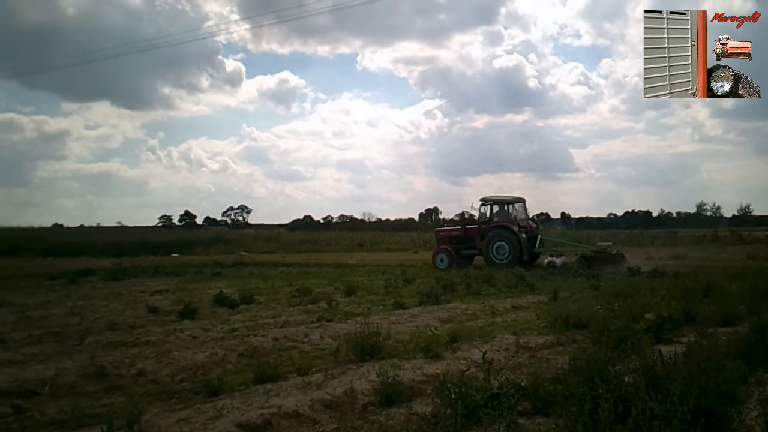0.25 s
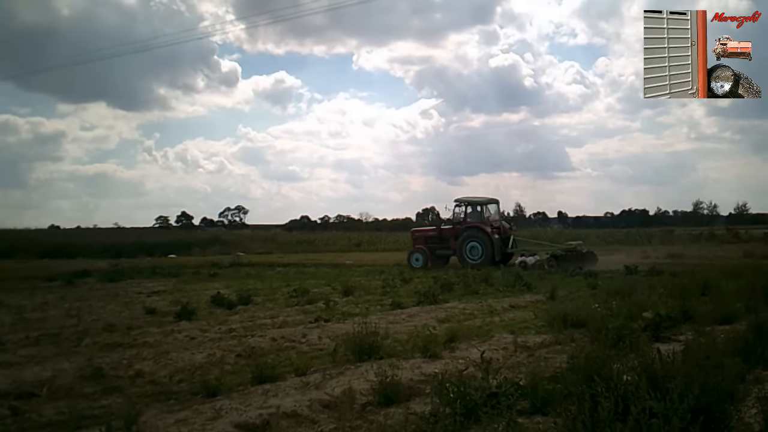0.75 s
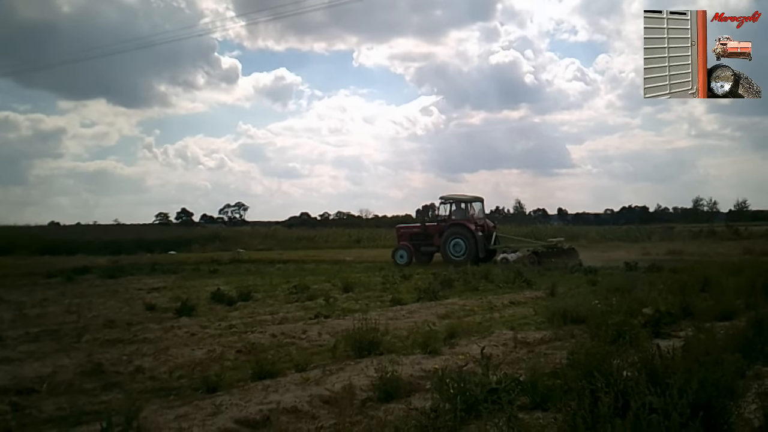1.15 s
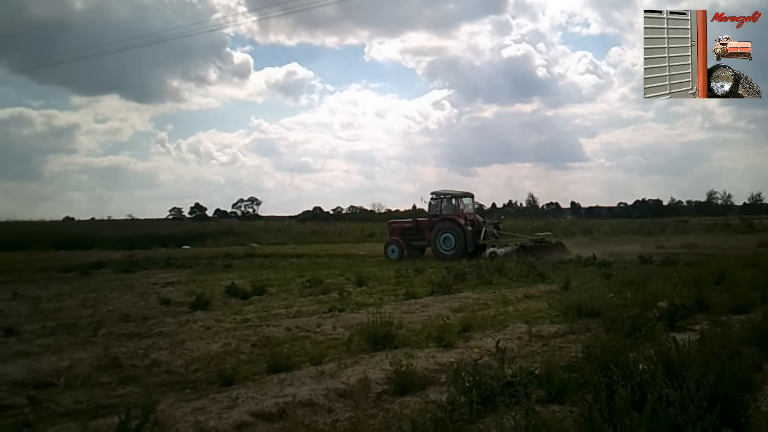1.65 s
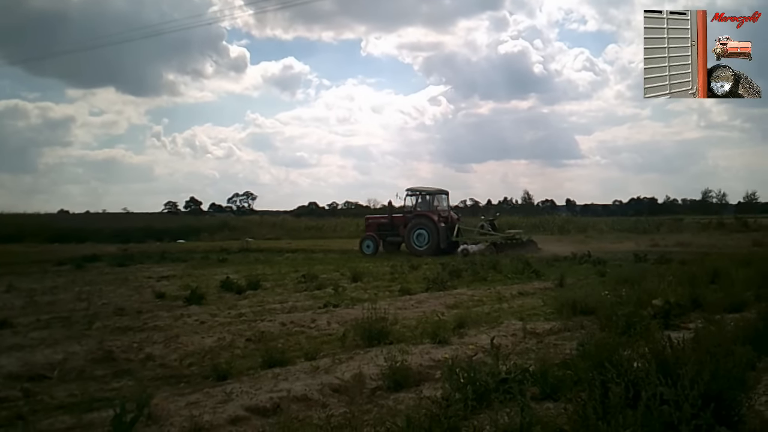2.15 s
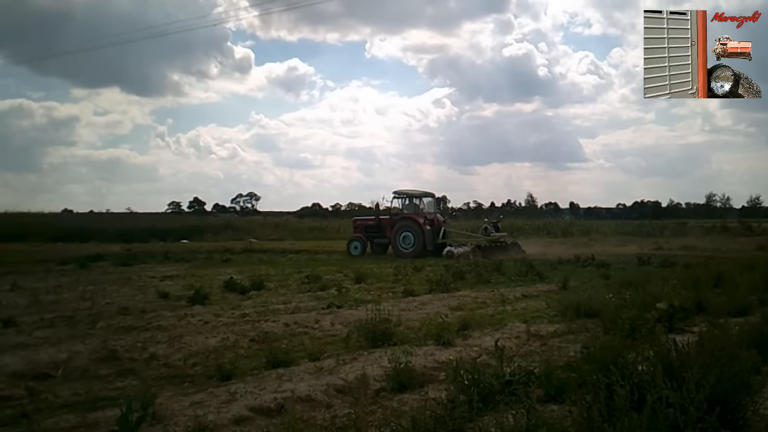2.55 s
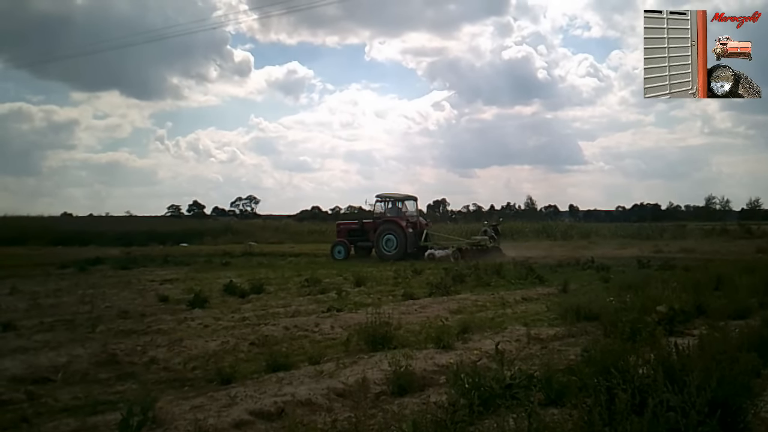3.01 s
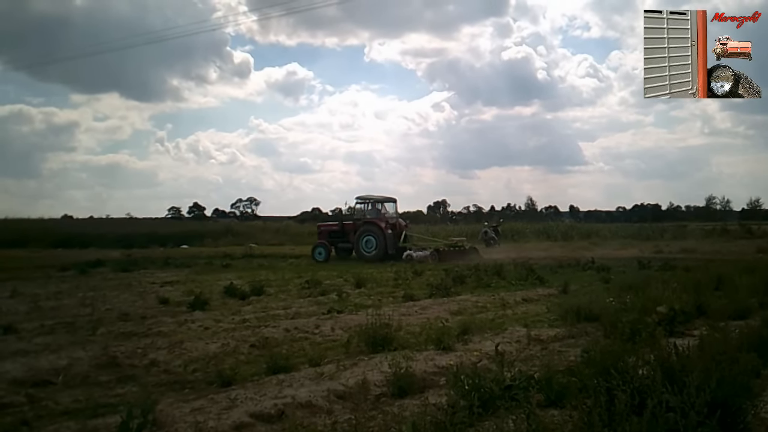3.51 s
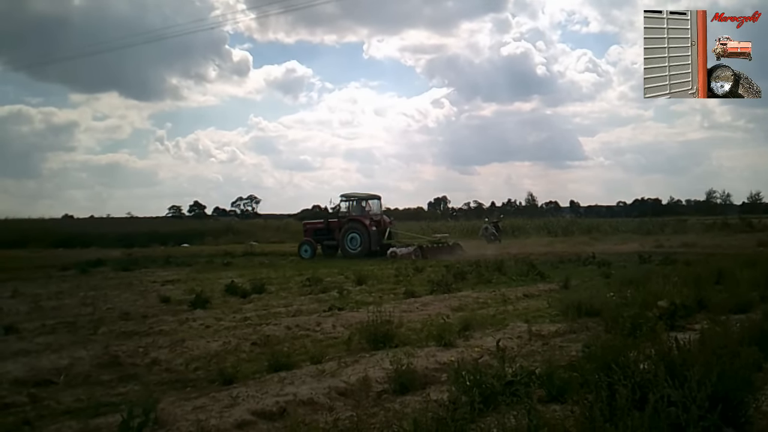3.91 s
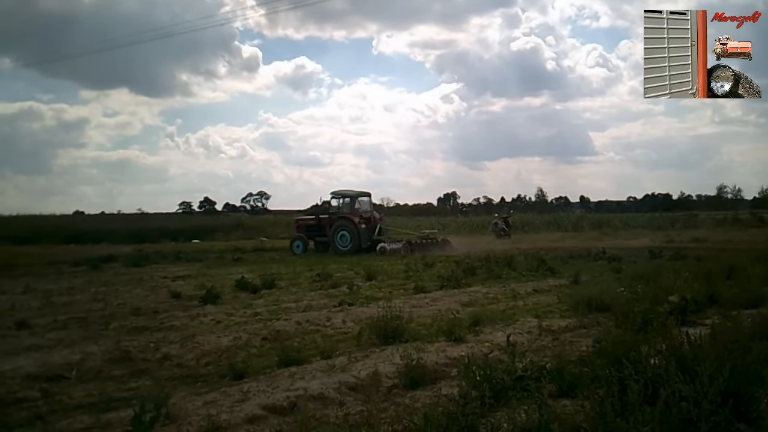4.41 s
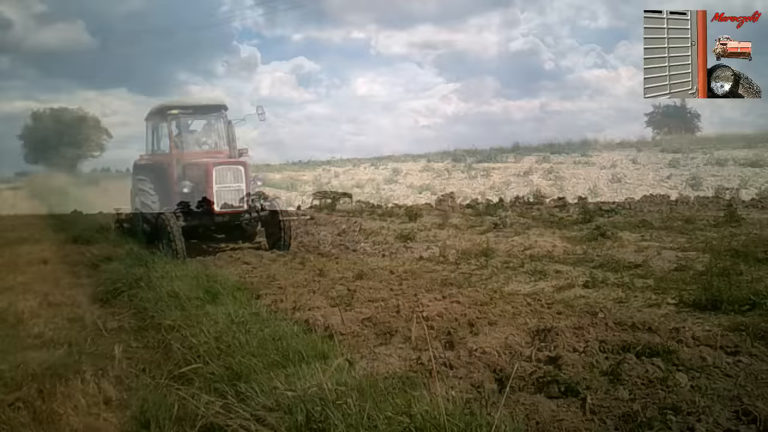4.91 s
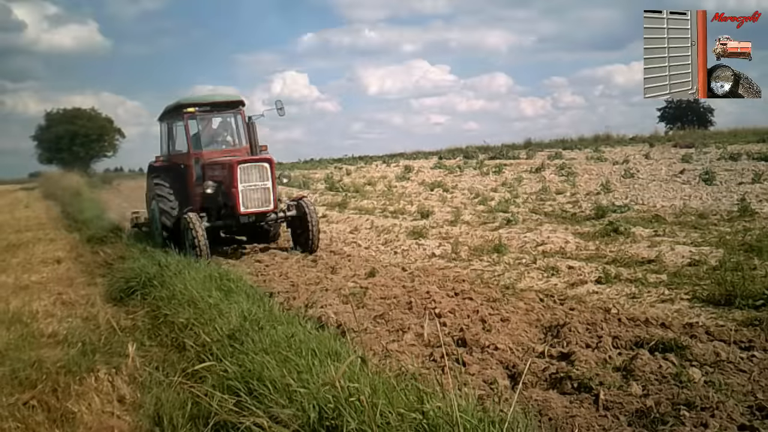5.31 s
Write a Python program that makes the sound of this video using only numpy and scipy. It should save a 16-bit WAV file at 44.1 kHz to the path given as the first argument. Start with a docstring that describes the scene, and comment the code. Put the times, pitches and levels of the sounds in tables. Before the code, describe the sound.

A diesel tractor chugs unevenly at a distance across a field, then a hard cut makes it loud, close, booming and slightly faster.

```python
"""Diesel tractor dragging a harrow

A four-cylinder diesel tractor drags a disc harrow across a field: far off, then, after a hard cut, close and head-on.
Every firing excites the exhaust modes as a thump, flares a rasp of gas noise and knocks on the engine block.
Far off, one faulty cylinder weakens and fires late in bouts, so the beat stumbles; close up, one firing almost fails.
Running gear and soil give shaped noise, a drone follows the far engine, short bright noise clicks dot the near view.
Close thumps are clipped by the camera's microphone, and the camera whines faintly throughout as a cluster of sines."""
import sys
import numpy as np
from scipy import signal
from scipy.fft import rfft, irfft, next_fast_len
from scipy.io import wavfile
from scipy.ndimage import map_coordinates

SR = 44100
rng = np.random.default_rng(int(sys.argv[2]) if len(sys.argv) > 2 else 0)


def file_out(sig):
    """Save sig as 16-bit WAV at sys.argv[1]."""
    # one column per channel
    cols = np.atleast_2d(sig).T
    # limit, then scale
    lim = np.clip(cols, -1, 1)
    pcm = np.round(lim * 32767).astype(np.int16)
    wavfile.write(sys.argv[1], SR, pcm)


N = 245195


def amp(db):
    """Level law: decibels to amplitude ratio."""
    return 10 ** (np.asarray(db) / 20)


def unit(x):
    """Normalisation: x scaled to rms 1."""
    return x / np.sqrt(np.mean(x ** 2) + 1e-20)


def clock():
    """Sampling: the time of each sample [s]."""
    return np.arange(N) / SR


def curve(rows):
    """Linear interpolation of (time, value) rows to one value per sample."""
    return np.interp(clock(), *np.transpose(rows))


def wobble(rate):
    """Band-limited fluctuation: a smooth random curve through rate knots a second."""
    knots = rng.standard_normal(int(N * rate / SR) + 4)
    return map_coordinates(knots, [clock() * rate])


def filtered(x, response):
    """Linear filtering: the spectrum of x times a response of frequency."""
    m = next_fast_len(N + SR // 2)
    return irfft(rfft(x, m) * response(np.fft.rfftfreq(m, 1 / SR)), m)[:N]


def coloured(x, points):
    """Spectral shaping through (frequency, level) points, rolled off beyond both ends; rms 1."""
    f, db = np.transpose(points)

    def response(hz):
        ends = np.minimum(hz / f[0], 1) / np.maximum(hz / f[-1], 1) ** 2
        return amp(np.interp(np.log(hz + 1), np.log(f), db)) * ends

    return unit(filtered(x, response))


def resonances(hz, modes, polarity):
    """Modal superposition of causal resonators; each mode is scaled by polarity to the power of its index."""
    total = 0
    for k, (centre, width, db) in enumerate(modes):
        damping = 1j * hz * width
        total = total + polarity ** k * amp(db) * damping / (centre * centre - hz * hz + damping)
    return total


def camera_whine():
    """Superposition of steady sinusoids: a thin high cluster from the camera itself."""
    # partials of the whine: (frequency [Hz], rms level [dB])
    partials = [(7854, -82), (7913, -74.5), (7973, -84), (8032, -83), (8086, -73.5)]
    whine = 0
    for hz, db in partials:
        whine = whine + amp(db) * np.sqrt(2) * np.sin(2 * np.pi * (hz * clock() + rng.random()))
    return whine


def bright_clicks(decay_s):
    """Transient excitation: short, bright noise clicks under exponentially decaying envelopes."""
    # clicks in the near view: (time [s], relative level [dB])
    clicks = [(4.654, -39), (4.7193, -37), (4.7637, -35), (4.7996, -37), (4.874, -36), (5.3439, -41),
              (5.4272, -34), (5.5135, -35)]
    t = np.arange(SR // 30) / SR
    s, db = np.transpose(clicks)
    envelope = signal.fftconvolve(impulses(s, db), np.exp(-t / decay_s))[:N]
    spectrum = [(1500, -2.5), (3300, 1.5), (4500, -8.0), (6200, -5), (8500, -7.5)]  # (Hz, dB)
    return envelope * coloured(rng.standard_normal(N), spectrum)


def crank(speed, first_s):
    """Phase is integrated frequency: firings counted so far, zero at first_s and whole at each firing."""
    turn = np.cumsum(speed) / SR
    return turn - np.interp(first_s, clock(), turn)


def firings(turn, cylinders_db, scatter_db, jitter_s):
    """Periodic excitation with jitter: times [s], sizes [dB] and cylinders of the firings."""
    number = np.arange(np.ceil(turn[0]), turn[-1]).astype(int)
    cylinder = number % len(cylinders_db)
    chance = rng.standard_normal((SR // 2, 2))[:len(number)]
    times = np.interp(number, turn, clock()) + jitter_s * chance[:, 0]
    return times, np.take(cylinders_db, cylinder) + scatter_db * chance[:, 1], cylinder


def stumbling(times, db, cylinder):
    """Irregular combustion: the first cylinder burns unsteadily, weakens and fires late in bouts."""
    # bouts of late firing: (time [s], length [cycles])
    bouts = [(.2, 3), (1.67, 2), (2.03, 1), (2.3, 1), (2.67, 1), (3.58, 2), (3.96, 1), (4.33, 1)]
    late_s, tiring_db_per_s, unsteady_db = .0039, 0.76, 2
    faulty = cylinder == 0
    own = np.flatnonzero(faulty)
    late = np.zeros(len(times))
    for s, cycles in bouts:
        first = np.argmin(abs(times[own] - s))
        late[own[first:first + int(cycles)]] = late_s
    loss_db = tiring_db_per_s * times + unsteady_db * rng.standard_normal(SR)[:len(times)]
    return times + late, db - faulty * loss_db


def impulses(times, db):
    """Impulsive excitation: one single-sample impulse per event."""
    index = np.clip(np.round(times * SR).astype(int), 0, N - 1)
    return np.bincount(index, amp(db), N)


def knock_sizes(db, scatter_db, hard_db):
    """Combustion variability: knock follows half the firing's decibels, and a few firings stand out."""
    hard_share = 0.073
    hard = rng.random(SR)[:len(db)] < hard_share
    return db / 2 + np.where(hard, hard_db, scatter_db * rng.standard_normal(SR)[:len(db)])


def machine_noise(turn, repeat):
    """Cyclostationary noise: white noise whose power share repeat recurs with every engine cycle."""
    cycle = turn / 4  # four firings to a cycle
    length = int(N / (cycle[-1] - cycle[0]))
    pattern = rng.standard_normal(SR)[(cycle % 1 * length).astype(int)]
    share = np.clip(repeat, 0, 1)
    return np.sqrt(share) * pattern + np.sqrt(1 - share) * rng.standard_normal(N)


def bursts(pulses, delay_s, rise_s, decay_s, between, rough_db):
    """Amplitude modulation: an envelope that flares with each firing above a floor (between)."""
    t = np.arange(SR // 10) / SR
    flare = (1 - np.exp(-t / rise_s)) * np.exp(-t / decay_s)
    train = signal.fftconvolve(pulses, flare / flare.max())[:N]
    delayed = np.interp(clock() - delay_s, clock(), train)
    return (between + delayed) * amp(rough_db * wobble(170))


def running_gear_rumble(turn, repeat, spectrum):
    """Friction and impact noise of the running gear and the harrow in the soil; rms 1."""
    return coloured(machine_noise(turn, repeat), spectrum)


def drone(turn, throb_db, waver, flutter_db):
    """Order-locked tone: a wavering hum at 13 times crank speed, throbbing every four firings; rms 1."""
    # two firings to a crank turn
    hum = np.sin(13 * np.pi * turn + waver * wobble(22))
    return unit(hum * amp(throb_db * np.cos(np.pi * turn / 2) + flutter_db * wobble(20)))


def clank(times, ring_hz, width_hz, delay_s):
    """Struck resonator: one cylinder knocks harder and leaves a short ring once a cycle; rms 1."""
    # drive of the ring by each cylinder, in firing order: (level [dB])
    drive_db = [-8.5, -8.5, 1, -8]
    blows = impulses(times + delay_s, np.resize(drive_db, len(times)))
    return unit(filtered(blows, lambda hz: resonances(hz, [(ring_hz, width_hz, 0)], 1) ** 2))


def block(hz, dull_hz):
    """Structural resonance: narrow bands of block and panels, with dark valleys between them."""
    # modes of the block: (frequency [Hz], half the width of each squared resonator [Hz], level [dB])
    modes = [(1339, 98, -1), (1455, 57, -4), (2070, 170, -4.5), (2423, 170, -6.5), (3360, 430, -16.5),
             (3960, 180, -18)]
    bands = 0
    for centre, width, db in modes:
        bands = bands + amp(db) * resonances(hz, [(centre, 2 * width, 0)], 1) ** 2
    return bands / (1 + (hz / dull_hz) ** 8)


def diesel_knock(blows, turn, repeat, dull_hz, **envelope):
    """Impact excitation: a short noise burst at each ignition rings the block; rms 1."""
    hammer = bursts(blows, **envelope) * machine_noise(turn, repeat)
    return unit(filtered(hammer, lambda hz: block(hz, dull_hz)))


def gas_rasp(blows, turn, repeat, spectrum, **envelope):
    """Turbulent flow noise flaring with each firing, shaped by the engine's panels; rms 1."""
    return coloured(bursts(blows, **envelope) * machine_noise(turn, repeat), spectrum)


def exhaust(pulses, modes, polarity, soft_hz):
    """Duct resonance: each firing's rounded puff of gas rings the pipe and silencer; rms 1."""
    # a negative polarity makes neighbouring modes swing against each other
    return unit(filtered(pulses, lambda hz: resonances(hz, modes, polarity) * np.exp(-(hz / soft_hz) ** 2)))


def far_tractor():
    """Distance and directivity: side-on across the field, labouring unevenly and drawing away."""
    # engine speed under the pull of the harrow: (time [s], firing rate [firings/s])
    far_speed = [(0.0, 42.6), (0.66, 43.44), (1.04, 43.15), (1.61, 44.89), (2.21, 44.26), (2.53, 43.36),
                 (2.73, 44.04), (3.68, 43.1), (4.1, 42.03), (4.43, 43.1)]
    # strength of each cylinder, in firing order: (level [dB])
    far_cylinders_db = [-.8, -0.5, 0.47, 0.71]
    # exhaust modes, side-on: (frequency [Hz], width [Hz], level before polarity weighting [dB])
    far_modes = [(43.6, 46, -14), (72, 30, 1), (128.5, 16, -8), (170.3, 30, -10.5)]
    # spectra of the rasp and of the rumble: (frequency [Hz], relative density [dB per Hz])
    far_rasp = [(300, -16.5), (720, -4), (1040, -12.5), (1370, -2.5), (1520, -5.5), (1710, -21.5),
                (2060, -6.5), (2530, -8.5), (2800, -17), (3390, -17), (4200, -33), (4900, -47),
                (6100, -29.5), (8500, -45.5)]
    far_rumble = [(15, -6.5), (32, 10), (60, -0.5), (150, -4.5), (230, -0.5), (310, -2), (390, -9),
                  (490, -15.5), (570, -13.5), (760, -14.5), (1100, -25), (2000, -60)]

    exhaust_fade, engine_fade, clank_fade = 0.3, 0.28, 4.5  # dB/s
    swell_db_per_hz = 0.28  # for each extra firing a second
    speed = curve(far_speed)
    # loudest while the open side of the engine faces the camera, at 2.55 s
    broadside_db = 1.45 * np.exp(-((clock() - 2.55) / .45) ** 2)
    engine_db = broadside_db + swell_db_per_hz * (speed - speed.mean()) - engine_fade * clock()

    turn = crank(speed, first_s=.0137)
    times, db = stumbling(*firings(turn, far_cylinders_db, scatter_db=1.53, jitter_s=0.00036))
    blows = impulses(times, knock_sizes(db, scatter_db=0.4, hard_db=2))
    rumble = running_gear_rumble(turn, repeat=.25, spectrum=far_rumble)
    hum = drone(turn, throb_db=3.5, waver=1.34, flutter_db=2)
    ring = clank(times, ring_hz=1367, width_hz=120, delay_s=.0002)
    knock = diesel_knock(blows, turn, repeat=0.22, dull_hz=3830, delay_s=-0.00017, rise_s=0.00032,
                         decay_s=0.0049, between=0.51, rough_db=4.0)
    rasp = gas_rasp(blows, turn, repeat=0.13, spectrum=far_rasp, delay_s=-0.0013, rise_s=0.0019,
                    decay_s=0.0036, between=0.76, rough_db=1.37)
    thump = exhaust(impulses(times, db), far_modes, polarity=0.98, soft_hz=178.0)

    mix = amp(-27.5 + engine_db + 1.4 * wobble(9)) * rumble
    mix += amp(-30.5 + engine_db) * hum
    mix += amp(-41.5 - clank_fade * clock()) * ring
    mix += amp(-42 + engine_db) * knock
    mix += amp(-39 + engine_db) * rasp
    return mix + amp(-15 - exhaust_fade * clock()) * thump


def near_tractor():
    """Near-field dominance of the exhaust: head-on, running faster, with a deep boom and one misfire."""
    # engine speed: (time [s], firing rate [firings/s])
    near_speed = [(4.45, 46.65), (4.72, 47.62), (5.0, 48.01), (5.28, 47.55), (5.55, 47.4)]
    # strength of each cylinder, in firing order: (level [dB])
    near_cylinders_db = [-0.073, -.2, 0.14, 0.016]
    # exhaust modes, head-on: (frequency [Hz], width [Hz], level before polarity weighting [dB])
    near_modes = [(61.6, 34, 0), (103.6, 59.7, -3), (203.4, 19, -11.5)]
    # spectra of the rasp and of the rumble: (frequency [Hz], relative density [dB per Hz])
    near_rasp = [(400, -11.5), (700, -0.5), (930, -12), (1040, 1), (1250, -6), (1490, 2.5), (1750, -14),
                 (2120, -2.5), (2510, -5.5), (2900, -14.5), (3390, -14), (4600, -41), (6100, -30.5),
                 (8500, -41.5)]
    near_rumble = [(15, -10), (70, 8), (200, -1), (330, -0.5), (480, -11.5), (540, -15), (610, -0.5),
                   (680, -4.5), (745, -1), (900, -19.5), (2000, -53.5)]

    misfire_s, misfire_db = 5.07, -22.5
    turn = crank(curve(near_speed), first_s=4.4586)
    times, db, _ = firings(turn, near_cylinders_db, scatter_db=1.0, jitter_s=0.00012)
    db[np.argmin(abs(times - misfire_s))] += misfire_db
    blows = impulses(times, knock_sizes(db, scatter_db=3.0, hard_db=2.5))
    rumble = running_gear_rumble(turn, repeat=.5, spectrum=near_rumble)
    knock = diesel_knock(blows, turn, repeat=0.35, dull_hz=3800, delay_s=0.0041, rise_s=0.00042,
                         decay_s=0.0051, between=0.32, rough_db=2.5)
    rasp = gas_rasp(blows, turn, repeat=0.25, spectrum=near_rasp, delay_s=0.002, rise_s=0.0012,
                    decay_s=0.0058, between=1.3, rough_db=1.3)
    thump = exhaust(impulses(times, db), near_modes, polarity=-0.94, soft_hz=164.7)

    mix = amp(-6) * bright_clicks(decay_s=.0015) + amp(-21.5) * rumble
    mix += amp(-35.5) * knock + amp(-30.0) * rasp
    return mix + amp(-4.5) * thump


def scene():
    """Superposition of sources: the far view cuts abruptly to the near one under a constant whine."""
    cut_s, cut_width_s = 4.4418, .0001
    near = np.clip((clock() - cut_s) / cut_width_s + .5, 0, 1)
    tractor = (1 - near) * far_tractor() + near * near_tractor()
    return (tractor + camera_whine())[None]


def record(dry):
    """Overload and band limit: the microphone clips flat, then a steep low-pass removes the top."""
    top_hz = 8700
    clipped = np.clip(dry[0], -.98, .98)
    return filtered(clipped, lambda hz: 1 / np.sqrt(1 + (hz / top_hz) ** 36))[None]


dry = scene()
out = record(dry)
file_out(out)
```